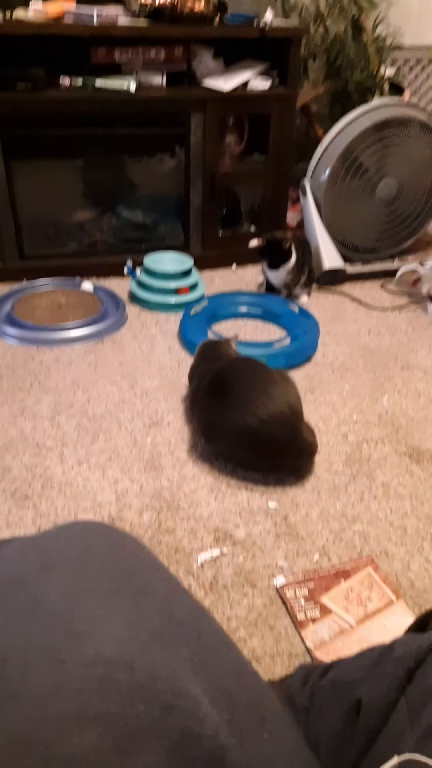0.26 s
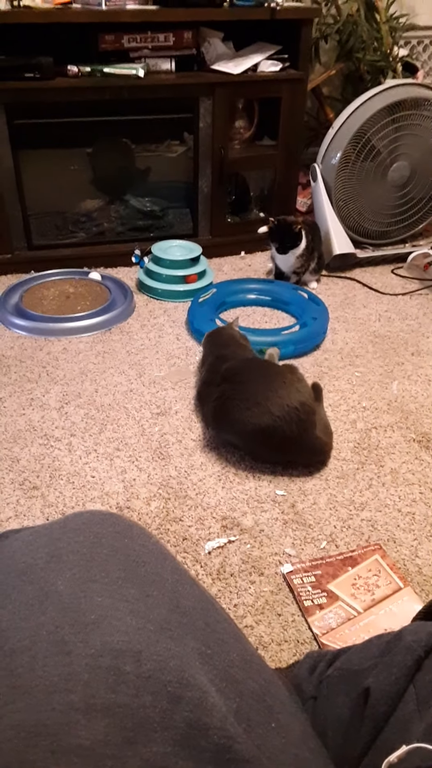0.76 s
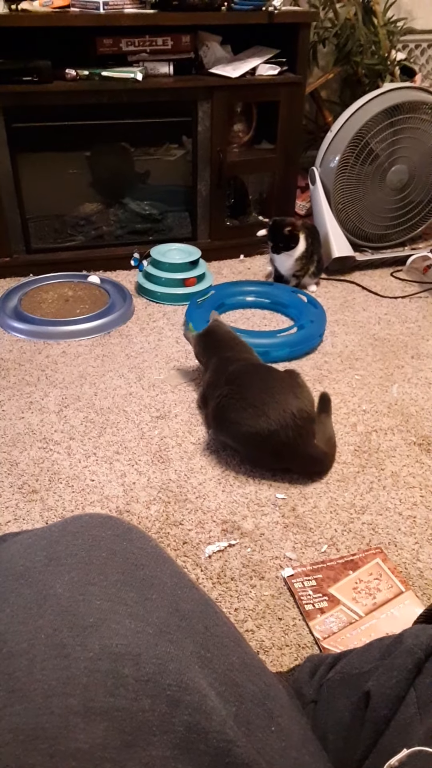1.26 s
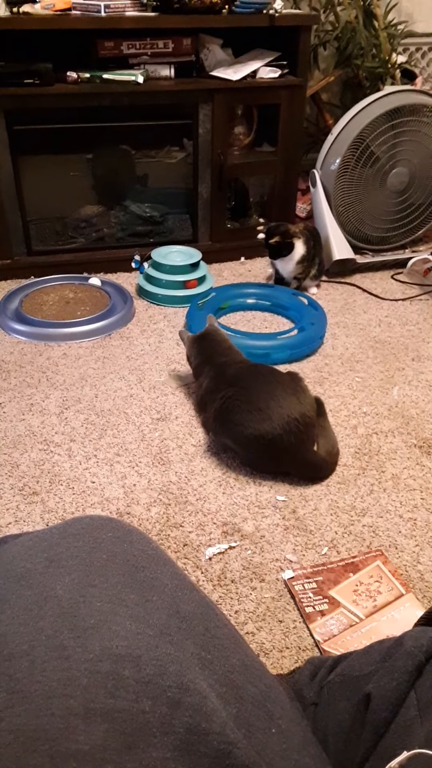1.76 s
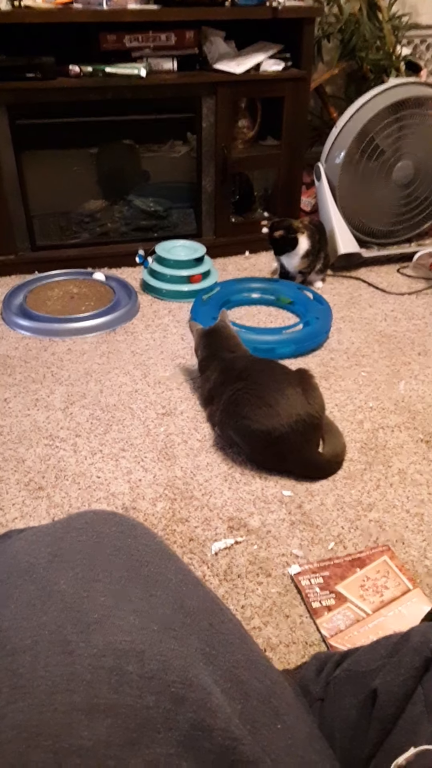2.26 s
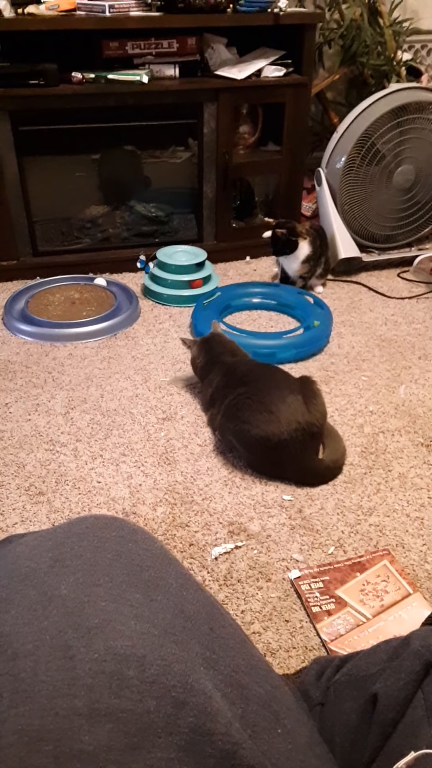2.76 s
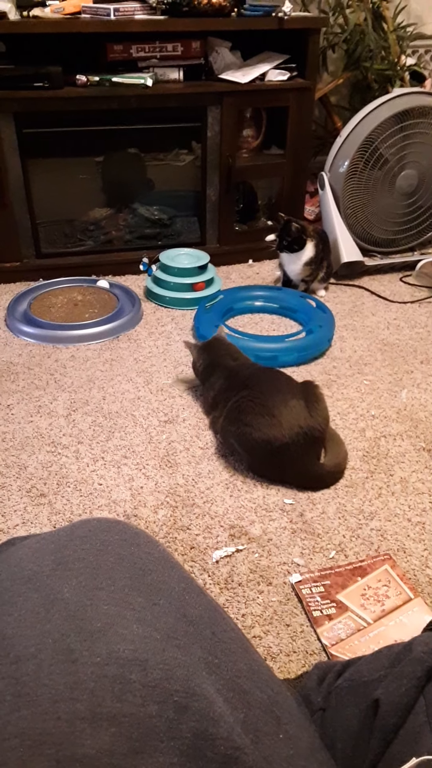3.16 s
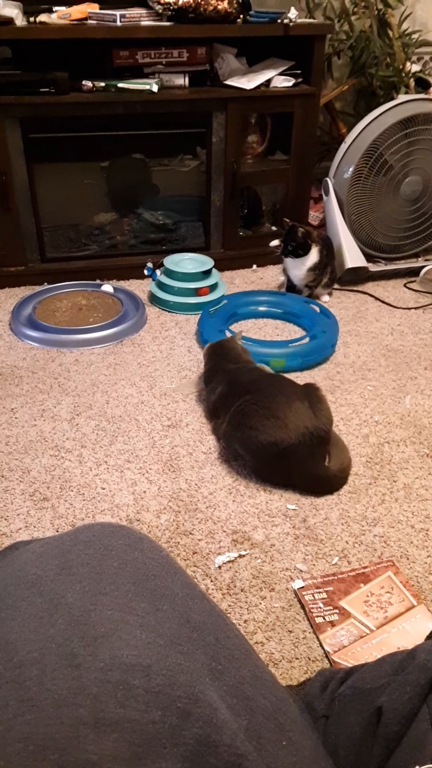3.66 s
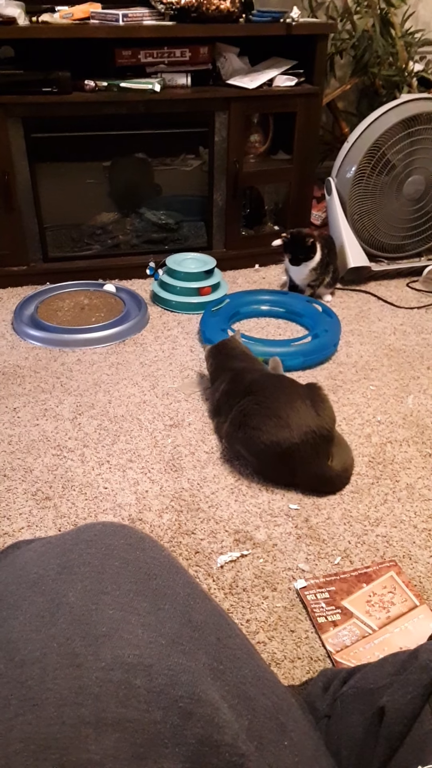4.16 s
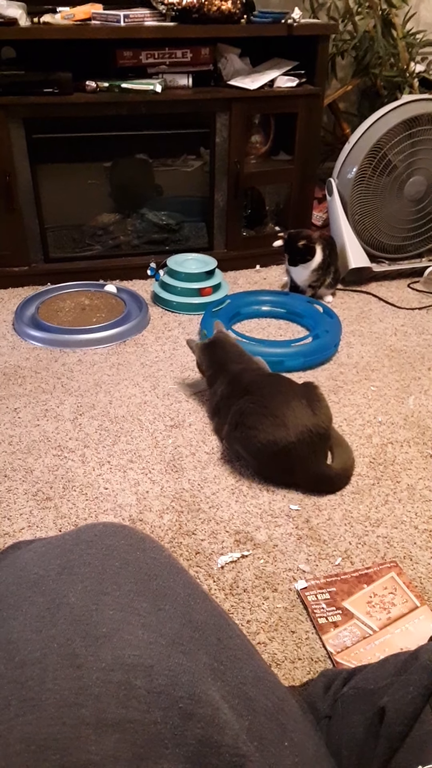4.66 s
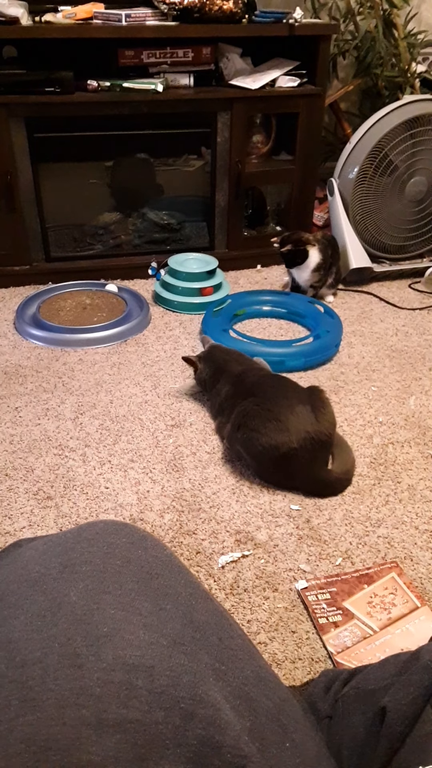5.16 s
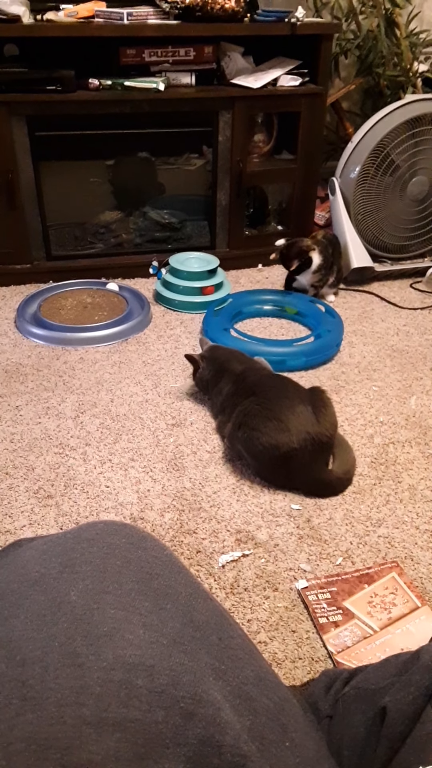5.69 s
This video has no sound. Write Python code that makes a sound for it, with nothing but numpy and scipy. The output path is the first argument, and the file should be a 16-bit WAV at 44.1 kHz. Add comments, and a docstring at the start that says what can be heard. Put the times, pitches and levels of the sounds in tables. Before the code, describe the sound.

Over a fan's low hum, a hard ball clacks, rolls and slows in a plastic track as a cat paws it twice.

```python
"""An appliance hums at mains frequency over a low, steady rush of air in a living room.
At 0.5 s a cat's paw scuffs a hard plastic ball along a ring-shaped track; knocks ring the hollow shell,
pushes rock the toy on the carpet, and the room answers. At 1.1 s a hard blow sends the ball coasting:
it rumbles, slows and rides up the wall about three times a second. At 3.9 s the paw scuffs it again,
and at 4.3 s sends it off more gently."""
import sys
import numpy as np
from scipy import signal
from scipy.fft import rfft, irfft, next_fast_len
from scipy.io import wavfile
from scipy.ndimage import uniform_filter1d, map_coordinates

SR = 44100
rng = np.random.default_rng(int(sys.argv[2]) if len(sys.argv) > 2 else 0)


def unload_wav(signal):
    """Save mono or channel-first audio to the path in sys.argv[1] as 16-bit WAV at rate SR, clipped to [-1, 1]."""
    wavfile.write(
        sys.argv[1],
        SR,
        np.round(np.clip(np.atleast_2d(signal).T, -1, 1) * 32767).astype(np.int16),
    )


N = 261513
RING = 16384  # samples that one touch rings for


def amp(db):
    """Decibels to gain."""
    return 10 ** (np.asarray(db) / 20)


def unit(x):
    """x at rms 1."""
    return x / np.sqrt(np.mean(x ** 2) + 1e-20)


def along(points, hz):
    """A curve of (f/Hz, value) breakpoints, read on a log axis."""
    f, v = np.transpose(points)
    return np.interp(np.log(hz + 1), np.log(f + 1), v)


def add(out, start, x):
    """Mix x into out from sample start on."""
    part = out[:, start:start + x.shape[1]]
    part += x[:, :part.shape[1]]


def wobble(rate):
    """A smooth random modulator, rate knots a second."""
    knots = rng.standard_normal(int(N * rate / SR) + 4)
    return map_coordinates(knots, [np.arange(N) * rate / SR])


def noise_pair(size, correlation, colour=1):
    """Mid/side noise whose stereo width depends on frequency."""
    hz = np.fft.rfftfreq(size, 1 / SR)
    turn = np.arccos(np.clip(along(correlation, hz), -1, 1)) / 2
    spectra = rfft(rng.standard_normal((2, size))) * colour
    mid, side = irfft(spectra * [np.cos(turn), np.sin(turn)], size)
    return np.array([mid + side, mid - side])


# a motor's shaft orders, the mains hum and weaker fan tones: f/Hz, rms level/dB
HUM_TONES = [(58, -60), (116, -70), (120, -60.5), (132.6, -72), (174, -73), (256.6, -69)]
# EQ of the air and hiss: f/Hz, relative level/dB
AIR_EQ = [(20, -37), (42, -15), (70, -1), (100, -2), (150, 0.5), (260, -5.5), (450, -12.5), (620, -26),
          (1100, -25), (2000, -28.5), (2500, -34), (8500, -39), (12000, -36), (15500, -35)]
# stereo image of the air, mono lows and wide highs: f/Hz, correlation
AIR_IMAGE = [(100, 1), (250, 1), (600, 0.63), (1500, 0.034), (12000, 0.012)]
def appliance(air_db=-58.5, flutter_db=.5, drift_hz=.05):
    """The bed: slightly unsteady hum tones over the rush of moving air."""
    air_eq = amp(along(AIR_EQ, np.fft.rfftfreq(N, 1 / SR)))
    air = unit(noise_pair(N, AIR_IMAGE, air_eq))
    hum = 0
    for hz, db in HUM_TONES:
        phase = 2 * np.pi * (rng.random() + np.cumsum(hz + drift_hz * wobble(1)) / SR)
        hum = hum + np.sqrt(2) * amp(db + flutter_db * wobble(3)) * np.sin(phase)
    return amp(air_db) * air + hum * amp([[.5], [-.5]])


def whiten(x, width_hz=260):
    """Flatten the broad colour; the fine ripple of the reflections stays."""
    spectrum = rfft(x)
    power = np.abs(uniform_filter1d(np.abs(spectrum) ** 2, int(width_hz * RING / SR), axis=-1))
    return irfft(spectrum / np.sqrt(power + 1e-12))


# decay of shell and room together: f/Hz, t60/s
ROOM_DECAY = [(200, 0.47), (900, 0.16), (2000, 0.17), (4500, 0.22), (8000, 0.17), (15000, 0.27)]
# stereo image of the room: f/Hz, correlation
ROOM_IMAGE = [(100, 0.66), (250, 1), (500, 0.54), (1000, 0.73), (3000, 0.17), (12000, 0.75)]
def room_response(chatter_db, direct_t60=.013, echo_s=.0032, echo_db=-1, chatter_t60=.055, room_db=-6):
    """One touch on its way: a crack, its echo off the cabinet, the ball's chatter, the room's tail."""
    t = np.arange(RING) / SR
    direct = amp(-60 * t / direct_t60)
    echo = (t > echo_s) * amp(echo_db - 60 * np.abs(t - echo_s) / direct_t60)
    early = np.hypot(direct + echo, amp(chatter_db - 60 * t / chatter_t60))
    hz, when, frames = signal.stft(noise_pair(RING, ROOM_IMAGE), SR, nperseg=256)
    decay = amp(-60 * when / along(ROOM_DECAY, hz)[:, None])
    tail = signal.istft(frames * decay, SR, nperseg=256)[1][:, :RING]
    # more chatter feeds more sound into the room
    tail = tail * np.hypot(1, 2 * amp(chatter_db)) * (1 - np.exp(-t / .011))
    return whiten(early * noise_pair(RING, ROOM_IMAGE) + amp(room_db) * tail)


# broad EQ of a contact on the shell: f/Hz, relative level/dB
SHELL_EQ = [(120, -19), (270, -11.5), (400, 5.5), (560, -7), (720, -0.5), (980, -1), (1150, 0), (1500, 3.5),
            (2080, 0.5), (2500, -8), (3300, -9), (4400, -14), (5200, -20), (6900, -18.5), (8400, -21.5),
            (15500, -27)]
# resonances of the hollow track: f/Hz, width/Hz, relative lift/dB
SHELL_MODES = [(702, 26, 8), (784, 18, 1), (899, 22, 11), (962, 40, 11), (1281, 20, 2), (1738, 20, 3),
               (1778, 17, 7), (1830, 28, 7), (1935, 20, 5), (2006, 26, 8), (3166, 30, 6), (3518, 34, 5),
               (4036, 26, 3), (4187, 28, 6), (6703, 30, 3)]
def shell_gain(hz, ring_db, spot_db=-1.9):
    """The track's body tone; each spot struck wakes its resonances in new proportions."""
    centre, width, db = np.transpose(SHELL_MODES)[:, :, None]
    lift = amp(db + ring_db + spot_db * rng.standard_normal(db.shape))
    peaks = np.sum(lift ** 2 / (1 + (2 * (hz - centre) / width) ** 2), axis=0)
    return amp(along(SHELL_EQ, hz)) * np.sqrt(1 + peaks)


def minimum_phase(gain):
    """The minimum-phase response that has this gain."""
    cepstrum = irfft(np.log(np.maximum(gain, 1e-6)))
    half = len(cepstrum) // 2
    cepstrum[1:half] *= 2
    cepstrum[half + 1:] = 0
    return np.exp(rfft(cepstrum))


def contact(hard_db, crack_db, weight_db, chatter_db, ring_db):
    """One touch, normalised in the mids: a harder one is brighter, a heavier one wakes the low modes."""
    hz = np.fft.rfftfreq(RING, 1 / SR)
    tilt_db = along([(1000, weight_db), (1700, 0), (2100, .0053), (3200, .51 * hard_db),
                     (4400, 1.24 * hard_db), (7000, 1.45 * hard_db), (9500, crack_db)], hz)
    spectrum = rfft(room_response(chatter_db)) * minimum_phase(shell_gain(hz, ring_db) * amp(tilt_db))
    mids = (hz > 600) & (hz < 2300)
    fade = np.interp(np.arange(RING) / RING, [.75, .95], [1, 0])
    return fade * irfft(spectrum) / np.sqrt(np.mean(np.abs(spectrum) ** 2 * mids))


def bumps(per_s=600, scatter_db=3):
    """Grain: tiny contacts at random moments and of random size, at rms 1."""
    hits = rng.random(N) < per_s / SR
    sizes = amp(scatter_db * np.clip(rng.standard_normal(N), -2, 2))
    return unit(hits * sizes * np.sign(rng.standard_normal(N)))


def swell(s, hold_s, attack_s, release_db_per_s):
    """An envelope that opens at s and starts its release hold_s later."""
    age = np.arange(N) / SR - s
    return np.clip(age / attack_s, 0, 1) * amp(-release_db_per_s * np.maximum(age - hold_s, 0))


# the paw scuffs the ball along the plastic: t/s, attack/s, hold from onset/s, level/dB, hardness/dB
PAW_SCUFFS = [(0.527, .01, 0.027, -59, -1.5), (0.6, 0.017, 0.026, -64, 4.5),
              (0.659, 0.009, 0.013, -51, -0.5), (0.849, 0.056, 0.069, -49.5, 1.5),
              (0.953, 0.018, .06, -47.5, 2.5), (1.14, 0.013, 0.051, -48, 10),
              (3.914, 0.014, 0.093, -58, -2.5), (4.04, 0.04, 0.11, -65, 3.5), (4.184, 0.02, .11, -62, 7.5),
              (4.328, 0.012, 0.02, -44.5, 3)]
def scuffing(weight_db=-11, chatter_db=-12, ring_db=-5):
    """Under the paw the ball skids: short, bright, light bursts of tiny contacts."""
    out, grain = np.zeros((2, N)), bumps()
    for s, attack_s, hold_s, db, hard_db in PAW_SCUFFS:
        start = round(s * SR)
        force = amp(db) * grain * swell(s, hold_s, attack_s, release_db_per_s=225)
        crack_db = -8 + 1.8 * hard_db
        touch = contact(hard_db, crack_db, weight_db, chatter_db, ring_db)
        add(out, start, signal.fftconvolve(force[None, start:start + RING], touch, axes=1))
    return out


# the top-end crack that a knock's hardness gives it: hardness/dB, level/dB
KNOCK_CRACK = [(-1, -29), (-27, -8), (3.5, -19), (9, 4), (11, 0)]
# the ball strikes the track: t/s, relative level/dB, hardness/dB
BALL_KNOCKS = [(0.66, -55, -2), (0.676, -57.5, 18), (0.76, -38, 7), (1.118, -21.5, 8.5), (1.21, -39, 5.5),
               (1.297, -45.5, 5), (1.405, -47, -2), (1.544, -41.5, -1), (1.635, -48, -2.5),
               (1.782, -43, -1), (1.82, -45.5, -1.5), (1.882, -46, 1.5), (2.032, -44.5, 6),
               (2.049, -45.5, 0), (2.07, -43.5, 1.5), (2.113, -52.5, 5), (2.168, -45.5, -1),
               (2.296, -44, -2), (2.346, -46, -0.5), (2.421, -46.5, -5), (2.569, -52.5, -6),
               (2.621, -53, -26), (2.694, -48.5, -10), (2.838, -48.5, -6.5), (3.134, -53, -2),
               (3.461, -61.5, 8), (3.964, -47.5, 5), (3.993, -46, 7.5), (4.119, -65.5, -15),
               (4.296, -34, 7), (4.357, -38.5, 10), (4.427, -41, -0.5), (4.49, -46.5, 2.5),
               (4.698, -38.5, -0.5), (4.914, -51, -5), (4.938, -43.5, -4.5), (5.198, -52.5, -2),
               (5.267, -42, 1.5), (5.504, -56, -9), (5.549, -49, -0.5), (5.575, -61, -13),
               (5.818, -53.5, -6), (5.866, -49, -8)]
def knocks(gain_db=25, weight_db_per_s=3):
    """A hard blow rebounds cleanly and rings the whole shell; a light one chatters."""
    out = np.zeros((2, N))
    for s, db, hard_db in BALL_KNOCKS:
        chatter_db = np.interp(db, [-40, -20], [-5, -13])
        ring_db = np.interp(db, [-40, -20], [-4, 2])
        crack_db = np.interp(hard_db, *np.transpose(KNOCK_CRACK))
        weight_db = -4 + weight_db_per_s * coast_time(s)
        touch = contact(hard_db, crack_db, weight_db, chatter_db, ring_db)
        add(out, round(s * SR), amp(db + gain_db) * touch)
    return out


# the track's lowest hollow notes, driven fully only by a hard blow: f/Hz, relative level/dB, t60/s
HOLLOW_NOTES = [(698, -4.5, 0.09), (870, 0.5, 0.0684), (947, 2, 0.06), (1650, -22, 0.11),
                (2070, -27, 0.088)]
def clack(gain_db=-8, growth=1.65):
    """A dry layer on each knock: hollow notes that grow faster than the strength of the blow."""
    out, t = np.zeros((2, N)), np.arange(SR // 4) / SR
    hardest_db = max(row[1] for row in BALL_KNOCKS)
    for s, db, _ in BALL_KNOCKS:
        ring = sum(amp(level + rng.normal(0, 1) - 60 * t / t60) * np.sin(2 * np.pi * hz * t)
                   for hz, level, t60 in HOLLOW_NOTES)
        drive_db = hardest_db + growth * (db - hardest_db)
        add(out, round(s * SR), amp(drive_db + gain_db) * ring[None])
    # the hollow notes keep nothing below about 500 Hz
    return signal.sosfilt(signal.butter(2, 500, 'highpass', fs=SR, output='sos'), out)


# pushes that rock the whole toy on the carpet: t/s, relative level/dB, f/Hz
TOY_THUDS = [(0.762, -52, 380), (.91, -52, 453), (1.119, -64, 394), (1.209, -53.5, 349), (1.55, -56.5, 423),
             (2.07, -57, 373), (3.461, -58.5, 387), (3.968, -65, 394), (4.296, -67, 370), (4.358, -58, 330),
             (5.238, -58, 374), (5.268, -67, 396)]
def thuds(t60=.045, attack_s=.0014, gain_db=15, room_db=-3):
    """The toy rocks with a low, damped note, heard dry and through the room."""
    out, t = np.zeros((2, N)), np.arange(RING) / SR
    for s, db, hz in TOY_THUDS:
        note = np.sin(2 * np.pi * hz * t) * amp(-60 * t / t60) * (1 - np.exp(-t / attack_s))
        wet = signal.fftconvolve(note[None], room_response(chatter_db=-12), axes=1)[:, :RING]
        room = amp(room_db) * unit(wet) * note.std()
        add(out, round(s * SR), amp(db + gain_db) * (note + room))
    return out


# the paw sends the ball coasting: t/s, end/s, relative level/dB
BALL_LAUNCHES = [(1.12, 3.905, -38), (4.296, 6, -43.5)]
# the coasting ball rides up the wall: t/s, hold from onset/s, level/dB
WALL_RIDES = [(1.264, 0.11, -53.5), (1.533, 0.053, -55.5), (1.743, 0.18, -57), (2.025, 0.29, -62),
              (2.329, 0.089, -59.5), (2.548, .13, -58.5), (2.83, 0.14, -59), (3.108, 0.11, -53.5),
              (3.43, 0.038, -59), (3.758, 0.064, -67), (4.611, 0.061, -49.5), (4.932, 0.035, -51.5),
              (5.087, 0.19, -69.5), (5.198, 0.036, -49.5), (5.484, 0.086, -55), (5.799, 0.17, -61.5)]
def rolling(build_s=.14, slowing_s=.091, fade_db_per_decade=27, block=3072):
    """A rumble of tiny contacts: it builds, fades as the ball slows, and swells on each wall ride."""
    t = np.arange(N) / SR
    age = coast_time(t)
    launch = np.zeros(N)
    for s, end_s, db in BALL_LAUNCHES:
        launch[(t >= s) & (t < end_s)] = amp(db)
    fade = amp(-fade_db_per_decade * np.log10(1 + age / slowing_s))
    coast = launch * np.minimum(age / build_s, 1) * fade
    rides = sum(amp(db) * swell(s, hold_s, attack_s=.027, release_db_per_s=227)
                for s, hold_s, db in WALL_RIDES)
    force = bumps() * np.hypot(coast, rides)
    out = np.zeros((2, N))
    for start in range(np.argmax(launch > 0), N, block):
        # a slowing ball sounds duller and heavier
        hard_db = -2 - .5 * age[start]
        weight_db = 1 + 2.5 * age[start]
        touch = contact(hard_db, crack_db=hard_db - 8, weight_db=weight_db, chatter_db=-12, ring_db=-6)
        add(out, start, signal.fftconvolve(force[None, start:start + block], touch, axes=1))
    return out


def coast_time(s):
    """Seconds since the ball's last launch; zero before the first."""
    starts = np.array([row[0] for row in BALL_LAUNCHES])
    last = np.maximum(np.searchsorted(starts, s, side='right') - 1, 0)
    return np.maximum(s - starts[last], 0)


# the toy's pan, treble to the left and lows to the right: f/Hz, left minus right level/dB
TOY_PAN = [(100, -10), (300, -5), (1000, -1.5), (2000, 0.2), (4000, 6), (8000, 4.5), (14000, 11)]
def scene(lag_s=.00019):
    """The mix: the toy, a little to the left, in the humming room; the left channel leads."""
    size = next_fast_len(N + RING)
    hz = np.fft.rfftfreq(size, 1 / SR)
    pan = amp(along(TOY_PAN, hz) * np.array([[.5], [-.5]]))
    pan = pan / np.sqrt(np.mean(pan ** 2, axis=0))
    toy = rfft(knocks() + clack() + rolling() + scuffing() + thuds(), size) * pan
    lag = np.exp(1j * np.pi * hz * lag_s * np.array([[1], [-1]]))
    return irfft((toy + rfft(appliance(), size)) * lag, size)[:, :N]


def record(dry, top_hz=15800):
    """A brick-wall low-pass on the whole mix."""
    size = next_fast_len(N + RING)
    passband = np.fft.rfftfreq(size, 1 / SR) < top_hz
    return irfft(rfft(dry, size) * passband, size)[:, :N]


dry = scene()
out = record(dry)
unload_wav(out)
```